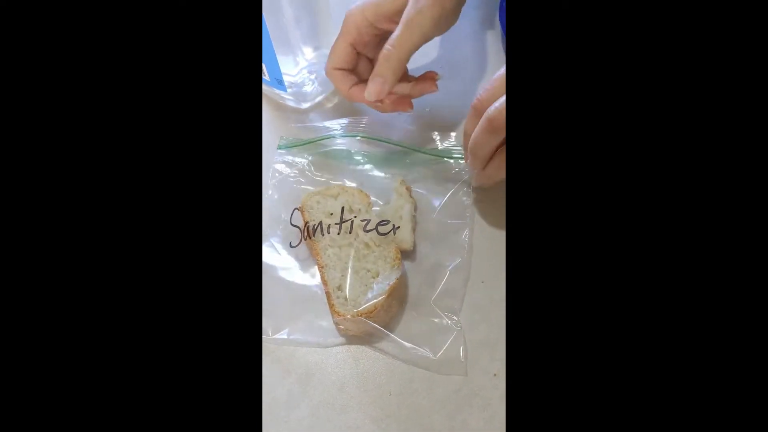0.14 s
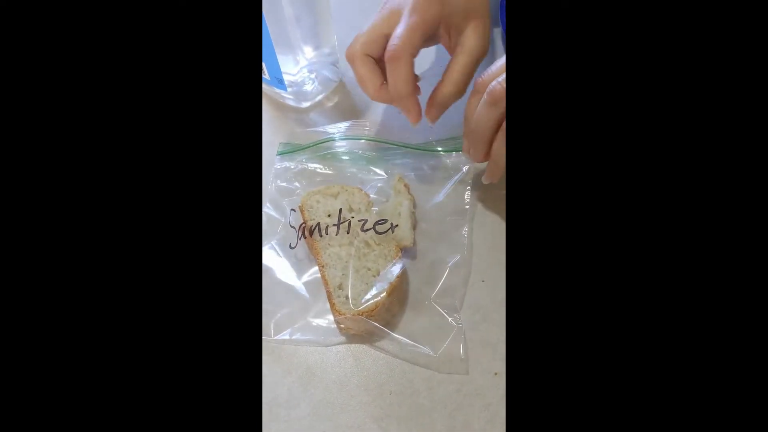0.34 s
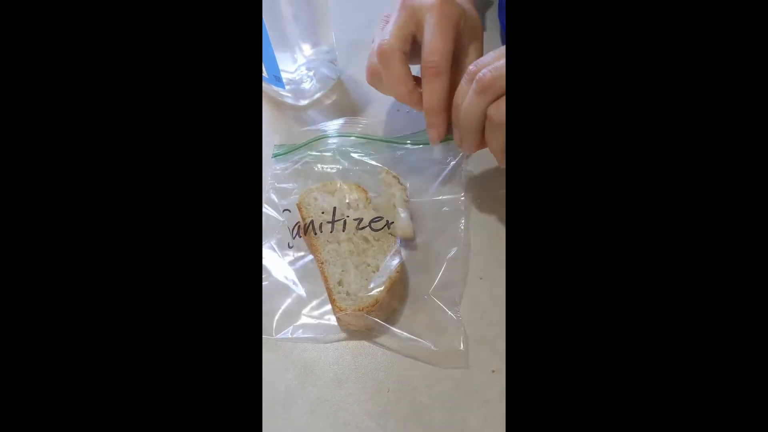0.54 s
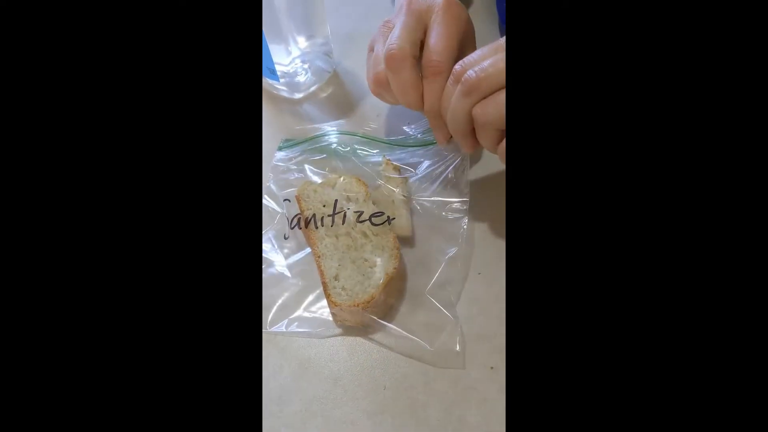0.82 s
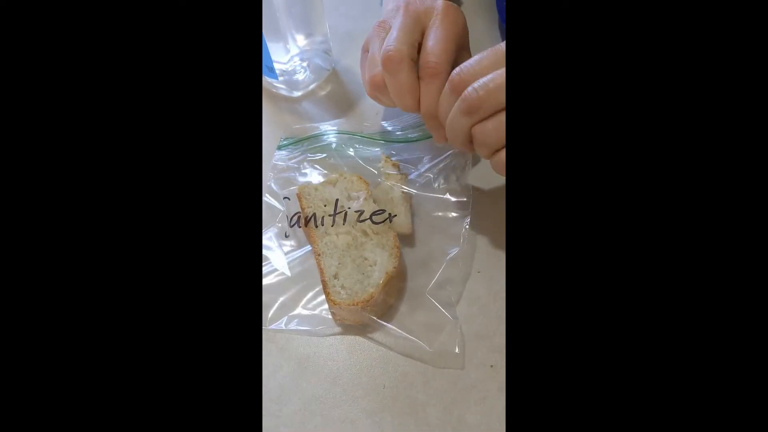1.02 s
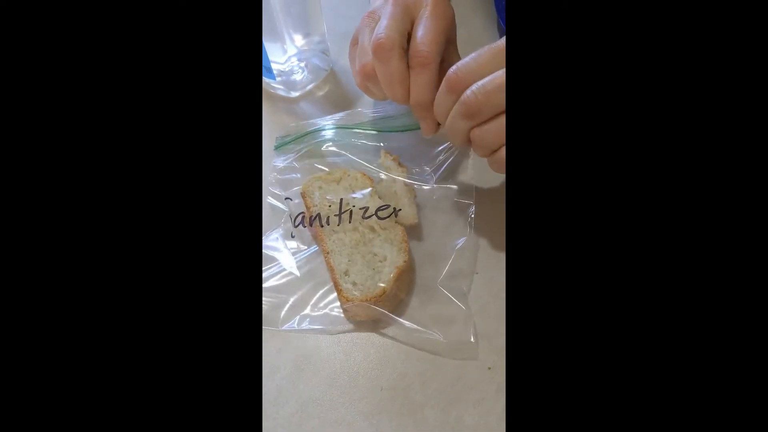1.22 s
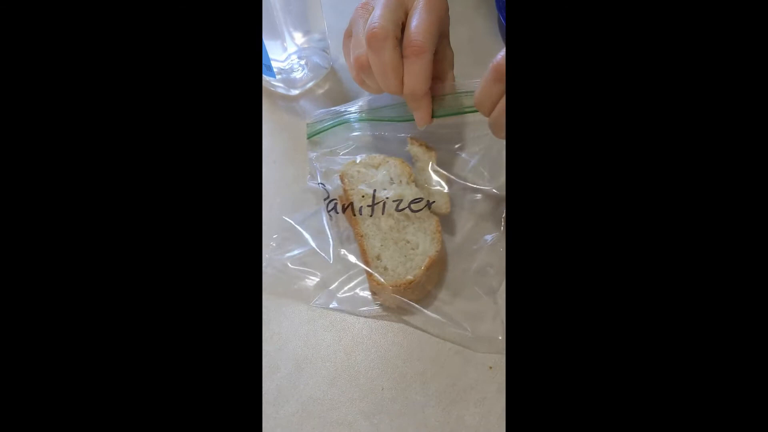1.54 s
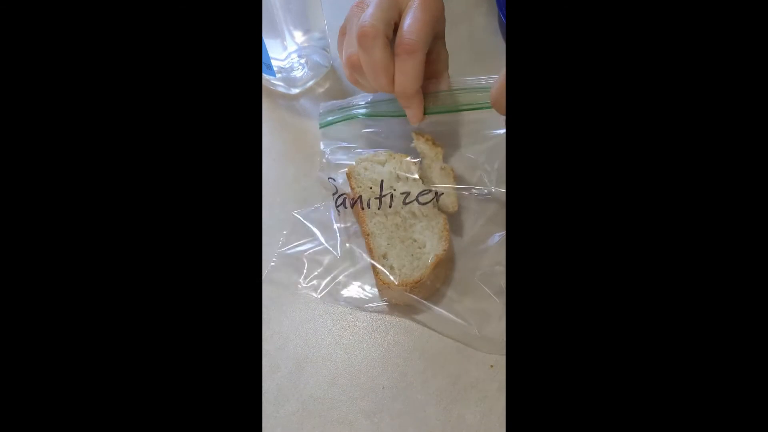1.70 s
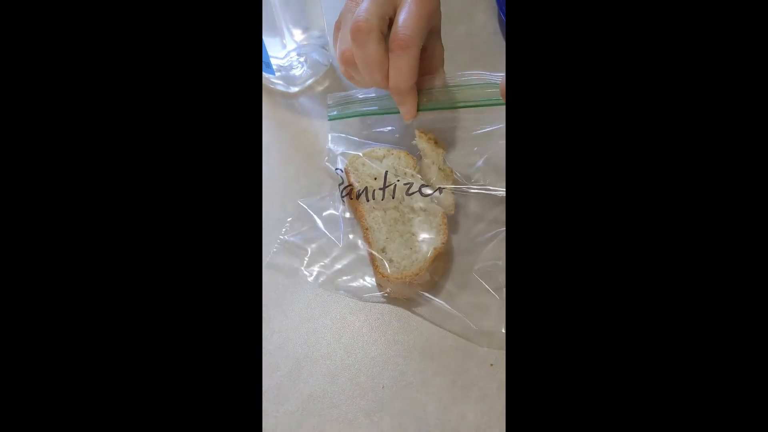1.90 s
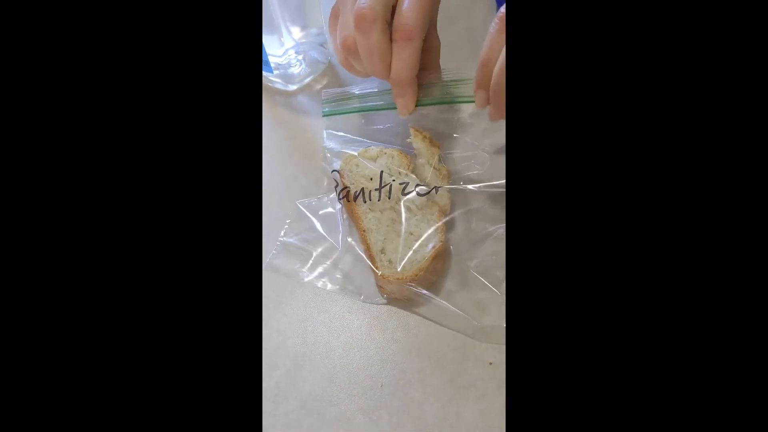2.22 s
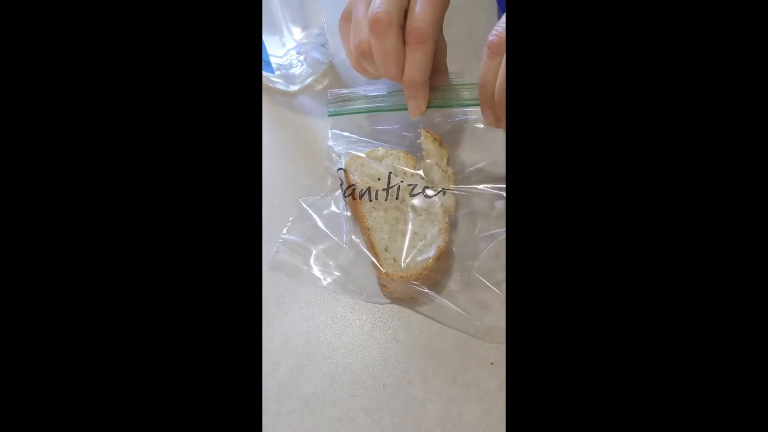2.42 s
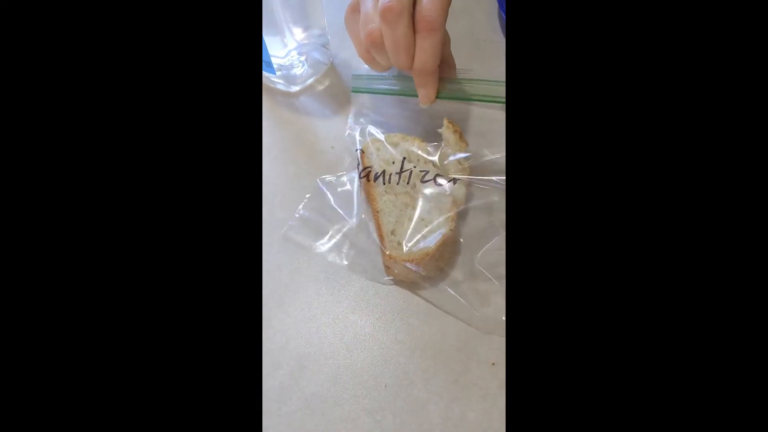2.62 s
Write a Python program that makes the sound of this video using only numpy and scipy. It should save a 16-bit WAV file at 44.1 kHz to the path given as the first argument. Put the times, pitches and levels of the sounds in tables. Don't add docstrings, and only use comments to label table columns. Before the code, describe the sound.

A thin plastic zipper bag crackles close to stereo microphones. Light ticks and tiny creases pop from 0.1 to 0.9 seconds, then a hard bright snap comes at about 1.08. Crinkles continue until another strong snap near 1.7, with a soft counter bump. Sliding fingers rustle and crackle from 1.8, with a dull bump at 2.2 and sparser ticks to 2.7. A faint low appliance hum wavers in the quiet kitchen.

```python
import sys
import numpy as np
from scipy import signal
from scipy.fft import rfft, irfft
from scipy.io import wavfile

SR = 44100
rng = np.random.default_rng(int(sys.argv[2]) if len(sys.argv) > 2 else 0)


def bounce(signal):
    frames = np.transpose(np.atleast_2d(signal))
    limited = np.clip(frames, -1, 1)
    pcm = np.round(limited * 32767).astype(np.int16)
    wavfile.write(sys.argv[1], SR, pcm)


def level_to_linear(level):
    exponent = np.asarray(level, float) / 20
    return 10 ** exponent


N = 121275


def rms_one(x):
    return x / np.sqrt(np.mean(x ** 2) + 1e-20)


def at_hz(points, hz):
    table_hz, values = np.array(points).T[:2]
    return np.interp(np.log(hz), np.log(table_hz), values)


def drift(rate_hz):
    r = np.exp(-2 * np.pi * rate_hz * 40 / SR)
    white = rng.standard_normal(N // 40 + 2002)
    slow = signal.lfilter([1], [1, -2 * r, r * r], white)[2000:]
    return np.interp(np.arange(N) / 40, np.arange(len(slow)), rms_one(slow))


def resonate(x, hz, width_hz):
    r = np.exp(-np.pi * width_hz / SR)
    top = np.array([1, 0, -1]) * (1 - r * r) / 2
    return signal.lfilter(top, [1, -2 * r * np.cos(2 * np.pi * hz / SR), r * r], x)


def left_right(pan_db):
    return level_to_linear(np.array([[pan_db / 2], [-pan_db / 2]]))


def lag_left(x):
    lag_s = 0.000193
    turn = np.exp(-2j * np.pi * np.fft.rfftfreq(N, 1 / SR) * lag_s)
    return np.array([irfft(rfft(x[0]) * turn, N), x[1]])


# (frequency [Hz], likeness [0 to 1])
EAR_LIKENESS = [(60, 1), (200, 1), (380, 0.8), (700, 0.61), (1300, 0.0053), (15000, 0.012)]


def banded(white, spectrum, patchy_db, alike_max):
    out, edges = 0, 40 * 2 ** np.arange(0, 9, .5)
    for k, (low, high) in enumerate(zip(edges, edges[1:])):
        band = signal.butter(2, [low, high], "band", fs=SR, output="sos")
        mid, side = signal.sosfilt(band, white[k % 2])
        hz = np.sqrt(low * high)
        alike = np.clip(at_hz(EAR_LIKENESS, hz), 0, alike_max)
        stereo = np.sqrt(1 + alike) * mid + np.sqrt(1 - alike) * side * [[1], [-1]]
        out = out + level_to_linear(at_hz(spectrum, hz) + patchy_db * drift(16)) * stereo
    return rms_one(out)


# (frequency [Hz], level [dB])
ROOM_COLOUR = [(40, -19.5), (125, -3.5), (250, -4.5), (400, -13), (750, -11.5), (1100, -31.5), (8500, -36),
               (14500, -37)]


def room():
    white = rng.standard_normal((2, 2, N))
    return level_to_linear(-54.5) * banded(white, ROOM_COLOUR, patchy_db=2.0, alike_max=0.92)


# (time [s], level [dB])
COMPRESSOR_LOAD = [(0.0, -61), (0.03, -60), (0.25, -48.5), (0.29, -77), (0.34, -60), (0.79, -54.5),
                   (0.82, -63.5), (1.17, -50), (1.49, -68), (1.58, -58.5), (1.72, -62.5), (2.04, -54),
                   (2.11, -69.5), (2.22, -53), (2.7, -63), (2.75, -52.5)]


def appliance():
    drone_hz, width_hz = 190.2, 9.8
    evenness = 0.59
    t = np.arange(N) / SR
    narrow = resonate(rng.standard_normal(N), drone_hz, width_hz)
    drone = rms_one(resonate(narrow, drone_hz, 3 * width_hz))
    drone = rms_one(drone / (np.abs(signal.hilbert(drone)) + .3) ** evenness)
    mains = level_to_linear(-61 + 0.31 * drift(11)) * np.sin(2 * np.pi * 59.6 * t)
    return mains + level_to_linear(np.interp(t, *np.transpose(COMPRESSOR_LOAD))) * drone


def kitchen():
    t60_s, treble_t60_s, wall_cut_hz = .28, .24, 6000
    t = np.arange(SR // 2) / SR
    white = rng.standard_normal((2, len(t))) * np.minimum(t / 0.0015, 1)
    low = signal.sosfilt(signal.butter(1, wall_cut_hz, fs=SR, output="sos"), white)
    tail = low * level_to_linear(-60 * t / t60_s) + (white - low) * level_to_linear(-60 * t / treble_t60_s)
    return tail / np.sqrt(np.sum(tail ** 2) / 2)


# (time [s], peak level [dB],
# pitch [Hz], time to fall 60 dB [s])
DAMPED_RINGS = [(1.628, -32.5, 647, 0.026), (1.709, -33.5, 644, 0.019), (1.743, -30.5, 695, 0.026),
                (1.744, -27.5, 295, 0.023), (2.224, -30, 804, 0.009), (2.2155, -24.5, 3680, 0.017),
                (2.216, -26, 1530, 0.017), (2.225, -28, 264, 0.039), (2.234, -25.5, 133, 0.045),
                (2.414, -36.5, 705, 0.02), (2.495, -38, 231, 0.057), (2.529, -30, 312, 0.015)]


def bumps():
    out, t = np.zeros(N), np.arange(N) / SR
    for s, db, hz, t60_s in DAMPED_RINGS:
        age = np.maximum(t - s, 0)
        onset = np.minimum(age * hz, 1)
        out += level_to_linear(db - 60 * age / t60_s) * onset * np.sin(2 * np.pi * hz * age)
    return lag_left([out] * 2)


# (time [s], rustle level [dB], extra sheen as fingers slide [dB])
FILM_MOTION = [(0, -53, -3), (.1, -65.5, 1), (.3, -71.5, -14), (.77, -62.5, -4), (.85, -71.5, -3),
               (1.05, -70, -6), (1.11, -57.5, 1.5), (1.29, -69, -2.5), (1.4, -62, 7.5), (1.6, -62.5, 5.5),
               (1.75, -60, -8), (1.89, -68.5, 2.5), (2.02, -56.5, -2), (2.18, -67, -17), (2.34, -72.5, -19),
               (2.43, -66, -8), (2.64, -64.5, 6.5), (2.75, -65, 4)]
# (frequency [Hz], level [dB])
RUSTLE_COLOUR = [(900, -1.5), (1900, 5.5), (3200, -4.5), (4600, -0.5), (7500, -5), (11000, -15), (13500, 8),
                 (16000, 0)]


def rustle():
    grains_per_s, grain_spread_db, grain_ms, hiss_share = 900, 3, .7, .9
    s, *columns = np.transpose(FILM_MOTION)
    db, sheen_db = (np.interp(np.arange(N) / SR, s, c) for c in columns)
    born = rng.random((2, 1, N)) < grains_per_s * level_to_linear(3.5 * drift(15)) / SR
    sizes = born * level_to_linear(grain_spread_db * np.minimum(rng.exponential(1, N), 5))
    fade = np.exp(-1000 / (grain_ms * SR))
    grains = rms_one(signal.lfilter([1], [1, -fade], sizes + 1e-18))
    white = rng.standard_normal((2, 2, N)) * (hiss_share + grains)
    colour = [(40, -44), (500, -25)] + list(RUSTLE_COLOUR)
    x = banded(white, colour, patchy_db=1.2, alike_max=0.66)
    low = signal.sosfilt(signal.butter(1, 5100, fs=SR, output="sos"), x)
    return level_to_linear(db + 7) * (low + level_to_linear(sheen_db) * (x - low))


# (time [s], peak level [dB], pitch [Hz], left-right [dB])
CREASE_POPS = [(0.025, -42, 4500, -0.5), (0.0564, -52, 2450, -0.5), (0.1074, -48, 2710, 6),
               (0.1171, -35.5, 3200, 8), (0.1825, -37, 1850, -2), (0.2137, -40, 1850, -1),
               (0.6118, -42.5, 1670, -6), (0.7442, -38, 2500, 2), (0.7824, -39, 2200, 3),
               (0.9213, -50, 1590, 4), (1.1224, -36, 2450, -4), (1.1497, -41, 4830, -1.0),
               (1.1694, -36, 1770, -9), (1.2915, -50, 1250, 0.0), (1.4252, -37.5, 2480, 3),
               (1.6298, -37.5, 1690, -4), (1.9544, -37, 5140, 7), (2.0141, -35, 5150, 4),
               (2.17, -45.5, 1550, -9), (2.1866, -41, 1100, -7), (2.4073, -42, 4330, 0.5),
               (2.4843, -38.5, 2300, -5), (2.504, -44, 5160, -0.5), (2.5262, -35.5, 1110, -7),
               (2.6543, -47, 1510, -7), (2.7247, -47, 1030, -10)]
# (time [s], peak level [dB], pitch [Hz])
FINE_POPS = [(.0248, -42, 9000), (.0784, -50, 11000), (.0874, -48, 13000), (.094, -40, 9700),
             (.1974, -38.5, 9910), (.2124, -47, 10500), (1.0656, -34, 13800), (1.0738, -24, 13000),
             (1.3984, -38, 13000), (1.6974, -38, 14500), (2.0444, -42, 8840), (2.237, -40, 13800),
             (2.5042, -42, 13700), (.3105, -50, 9000), (.787, -44, 13500), (.8915, -38, 13800)]
# (time [s], peak level [dB], pitch [Hz], left-right [dB])
SNAP_BODY_POPS = [
    (1.0732, -18.5, 4050, 2),
    (1.7093, -18, 3900, 6),
    (0.1165, -32, 2270, 1),
]


def pops():
    puff_ms, sharpness = 1.3, 1.5
    out, t_ms = np.zeros((2, N + 400)), np.arange(400) * 1000 / SR
    fine = [(*row, 0) for row in FINE_POPS]
    for s, db, hz, pan_db in CREASE_POPS + fine + SNAP_BODY_POPS:
        chance = rng.standard_normal((3, len(t_ms)))
        puff = (chance[0] + 0.54 * chance[1:]) * np.exp(-t_ms / puff_ms)
        width_hz = hz / sharpness
        ring = resonate(resonate(puff, hz, width_hz), hz, width_hz)
        i = int(s * SR)
        out[:, i:i + len(t_ms)] += level_to_linear(db + 0.1) * left_right(pan_db) * ring / np.abs(ring).max()
    return lag_left(out[:, :N])


# (time [s], bright peak [dB], body level [dB], left-right [dB])
SETTLING = [(0.116, -31.5, -44, 5.5), (0.1829, -50, -56.5, 6), (0.1909, -35.5, -49, -5),
            (0.2374, -41, -66, -13), (0.255, -58, -49.5, -1), (0.4493, -34.5, -49.5, -1),
            (0.474, -23.5, -46.5, -6.5), (0.5142, -33.5, -47.5, 10), (0.5721, -64, -56.5, 12),
            (0.585, -38, -51, -4), (0.6807, -28, -51, -6), (0.7424, -35.5, -60, 1),
            (0.766, -27, -44.5, -3.5), (0.8901, -31, -53, -3.5), (0.9163, -42, -62, -1)]
# (time [s], bright peak [dB], body level [dB], left-right [dB])
CROWDED = [
    (1.0594, -32, -47, -2),
    (1.079, -10, -39, 9.5),
    (1.7055, -37, -66, 1),
    (1.9265, -29, -44, 2),
    (1.9367, -38, -48, 1),
]
# (time [s], bright peak [dB],
# body level [dB], length [ms], left-right [dB])
SEAL_SNAPS = [(1.0693, -22, -36.5, 2.8, -4), (1.0725, -35, -36.5, 3.4, -9), (1.0773, -5, -42, 0.88, -1),
              (1.1148, -42, -45, 3, -4), (1.1492, -52, -60, 1.3, 1), (1.17, -49, -67, 1.3, -1),
              (1.2471, -63, -54.5, 0.42, 20), (1.34, -20.5, -44, 5.1, 1), (1.386, -34, -49.5, 0.63, -9),
              (1.4584, -30.5, -63, 1.9, -8), (1.4976, -24, -49.5, 3.8, -6), (1.5061, -31, -34, 0.67, -2),
              (1.55, -19.5, -38.5, 1.8, -0.5), (1.6568, -32.5, -73, 2.4, -10), (1.6715, -25, -55, 1.4, -1),
              (1.709, -7, -33.5, 0.7, -2), (1.8065, -16.5, -34.5, 6.2, -0.5), (1.8505, -31, -49.5, 1.1, -6),
              (1.8604, -35, -46.5, 1.3, 1),
              (1.9073, -33, -58, 1.5, -2), (1.9303, -29, -47.5, 2.7, -3), (1.9348, -26.5, -56, 1.5, -4),
           (1.9409, -64, -47, 1.3, 4), (1.9835, -20.5, -43, 2.7, 0), (1.991, -28, -46.5, 6.3, 0),
           (2.0023, -25, -50, 6.1, -11), (2.023, -26.5, -42, 4.5, 1), (2.0283, -32, -41.5, 1.5, 0),
           (2.0959, -24, -50, 3.5, 0.5), (2.142, -39, -52.5, 4.8, -2), (2.1854, -52, -54.5, 1.7, -4),
           (2.2242, -35, -40.5, 9.2, 7), (2.3987, -43, -54.5, 5, 1), (2.414, -44, -53, 7.4, 6),
           (2.4263, -26.5, -45, 0.44, -1), (2.4814, -59, -74, 1.5, -8), (2.4948, -34, -50.5, 3.6, 2),
           (2.526, -21.5, -53, 2, -2), (2.5336, -51, -47, 7.1, 6), (2.5598, -41, -50, 1.7, 1),
           (2.686, -32.5, -51, 2.1, -1)]
# (time [s], bright peak [dB], body level [dB], length [ms], left-right [dB])
SQUEEZING = [
    (1.7453, -20, -35, 7.7, 2.5),
    (2.2177, -28.5, -40, 6.8, -3),
]
# (frequency [Hz], width [Hz], level [dB])
FILM_BODY = [(1460, 2360, -5), (2360, 990, 0.5), (3640, 1260, -4), (4270, 390, 3.5), (5490, 3200, -7)]
# (frequency [Hz], width [Hz], level [dB])
FILM_BRIGHT = [(8600, 5700, -8), (10960, 1100, -0.5), (12240, 1020, 0.5), (13670, 1250, 3.5),
               (14400, 2000, 0.5)]


def snaps():
    tick_ms, crack_ms, swell_ms, creak_ms = 1.66, 0.16, 4.6, 5.0
    creak_db, slow_spray, first_crack = -31, .45, 4.1
    bright_gain_db, body_gain_db, colour_spread_db = -2, 13, 2
    rows = [(s, a, b, tick_ms, p, crack_ms) for s, a, b, p in SETTLING + CROWDED]
    rows += [(*row, crack_ms) for row in SEAL_SNAPS]
    rows += [(*row, swell_ms) for row in SQUEEZING]
    out, t_ms = np.zeros((2, N + 2000)), np.arange(-800, 1200) * 1000 / SR
    after = np.maximum(t_ms, 0)
    for s, bright_db, body_db, ms, pan_db, rise_ms in rows:
        chance, colour = rng.standard_normal((5, len(t_ms))), rng.standard_normal((2, 5))
        ms = np.clip(ms, .3, 6)
        strain = np.exp(t_ms / rise_ms) + level_to_linear(creak_db) * np.exp(t_ms / creak_ms)
        dying = np.exp(-4 * after / ms) + slow_spray * np.exp(-after / ms)
        shape = np.where(t_ms < 0, strain, dying)
        stereo = chance[0] + chance[1:3]
        spray = stereo * (np.abs(chance[3]) + 1.4) * shape + first_crack * (t_ms == 0)
        sound = 0
        for peaks, db, own in ((FILM_BRIGHT, bright_db + bright_gain_db, colour[0]),
                               (FILM_BODY, body_db + body_gain_db, colour[1])):
            part = 0
            for k, (hz, width_hz, peak_db) in enumerate(peaks):
                gain = (-1) ** k * level_to_linear(peak_db + colour_spread_db * own[k])
                part = part + gain * resonate(spray, hz, width_hz)
            sound = sound + level_to_linear(db) * part / np.abs(part).max()
        i = int((s + .0009) * SR) - 800
        out[:, i:i + len(t_ms)] += sound * left_right(pan_db)
    return lag_left(out[:, :N])


def scene():
    film, knocks = snaps(), bumps()
    air, echo = room(), kitchen()
    friction, hum = rustle(), appliance()
    film = film + pops()
    wet = signal.fftconvolve(film + 1.06 * knocks, echo, axes=1)[:, :N]
    return film + knocks + level_to_linear(-11) * wet + friction + air + hum


def band_limit(x):
    return signal.sosfilt(signal.butter(12, 16980, fs=SR, output="sos"), x)


def record(dry):
    port = .5 * resonate(dry, 13800, 250)
    air = 0.29 * resonate(dry, 15200, 770)
    x = dry + port + air
    x = signal.sosfilt(signal.butter(4, 48, "high", fs=SR, output="sos"), x)
    x = signal.sosfilt(signal.ellip(6, .5, 26, 16000, fs=SR, output="sos"), x)
    return band_limit(x)


dry = scene()
out = record(dry)
bounce(out)
```